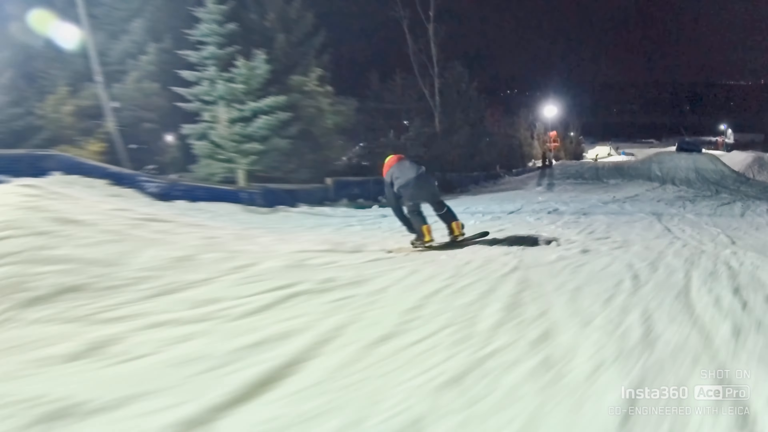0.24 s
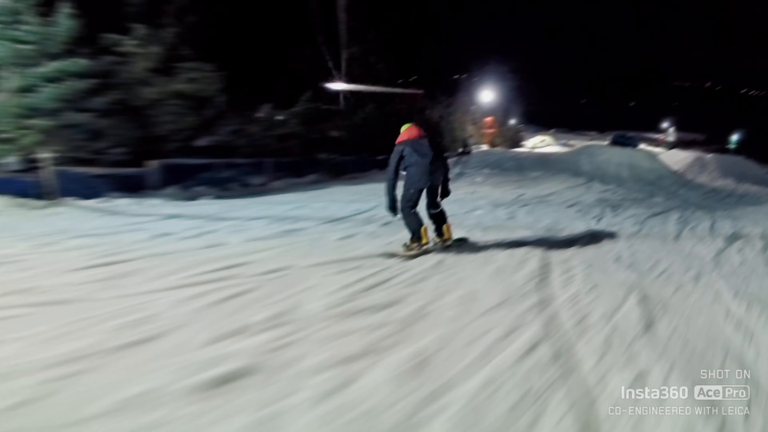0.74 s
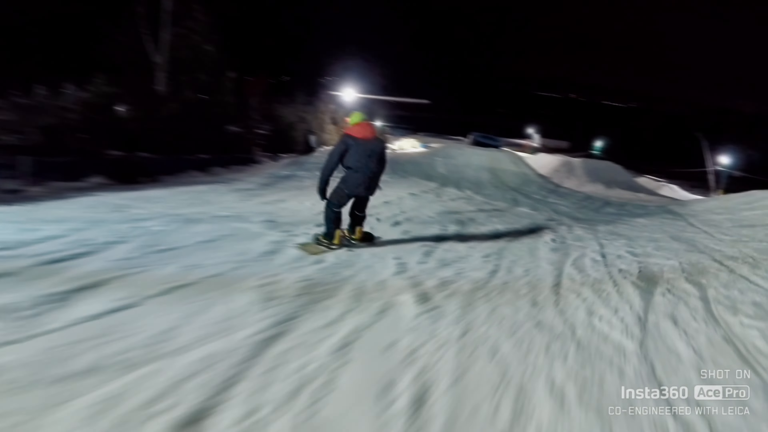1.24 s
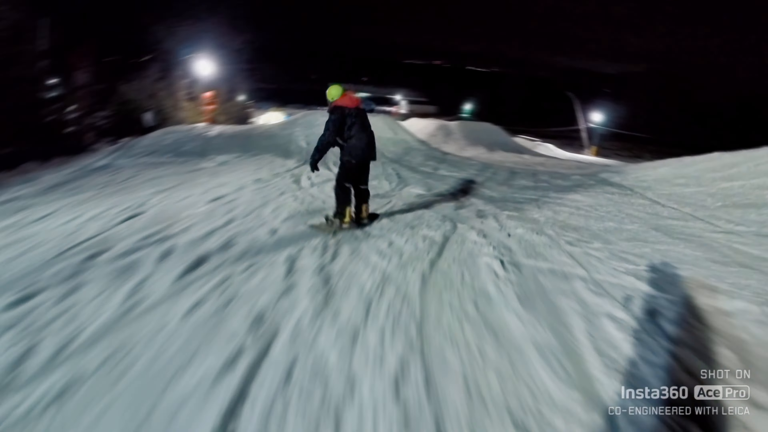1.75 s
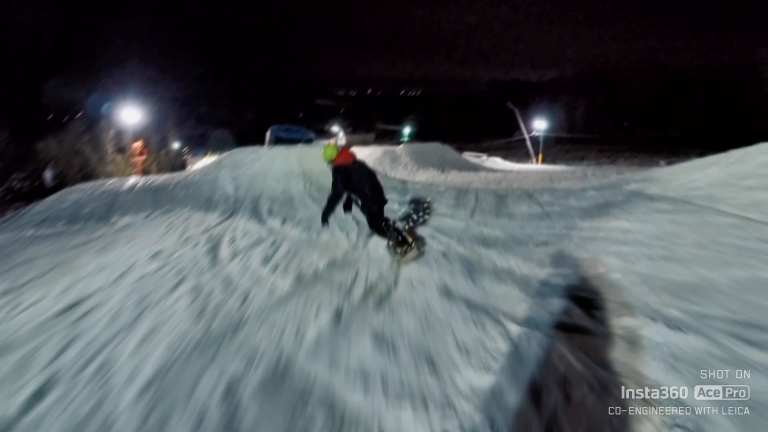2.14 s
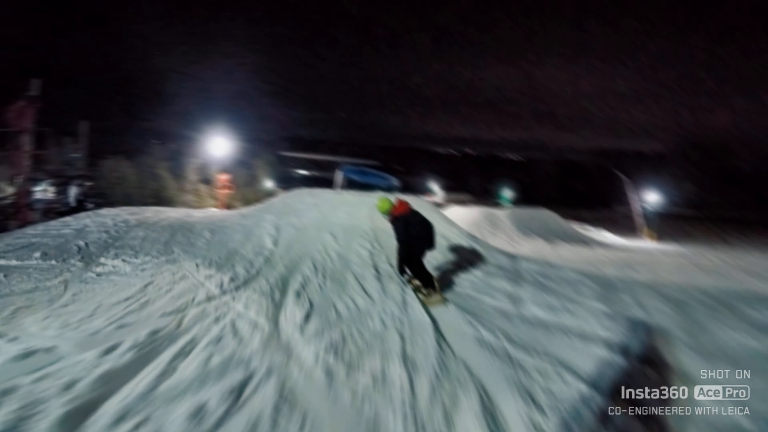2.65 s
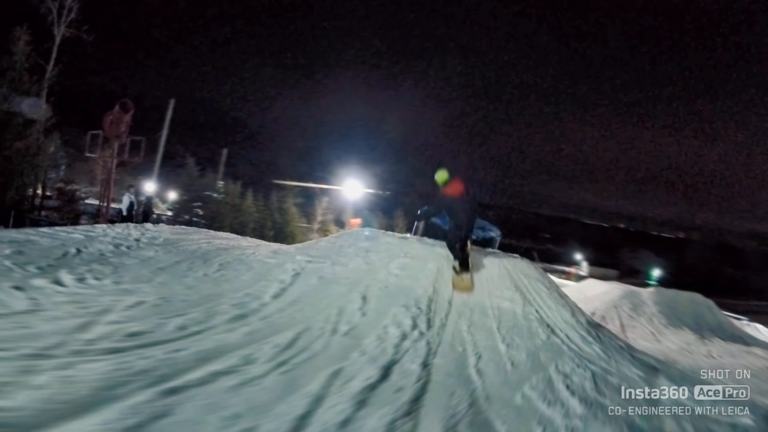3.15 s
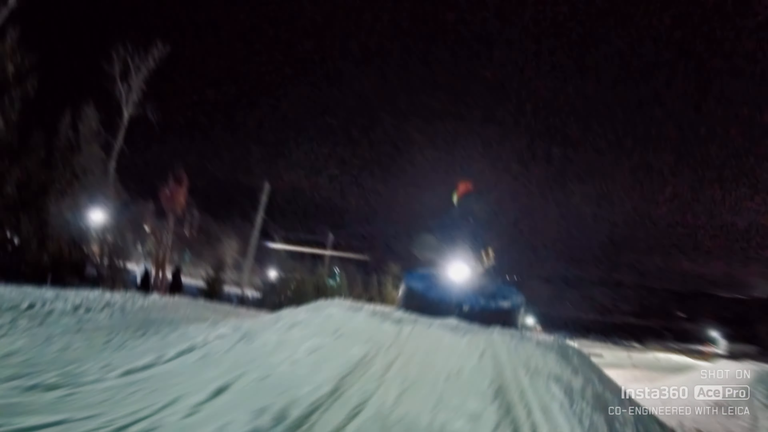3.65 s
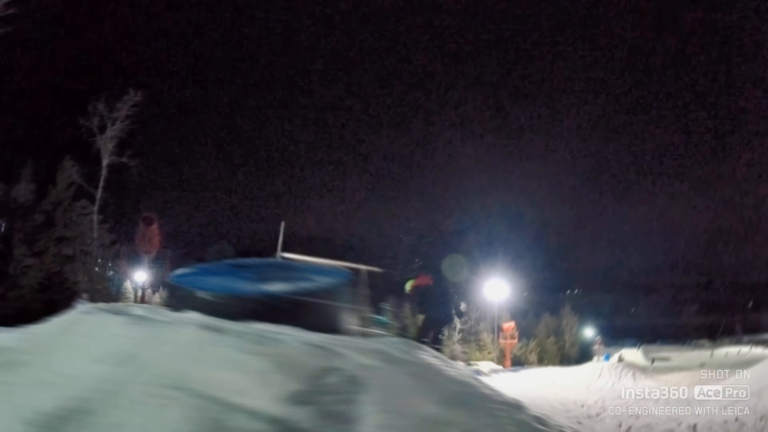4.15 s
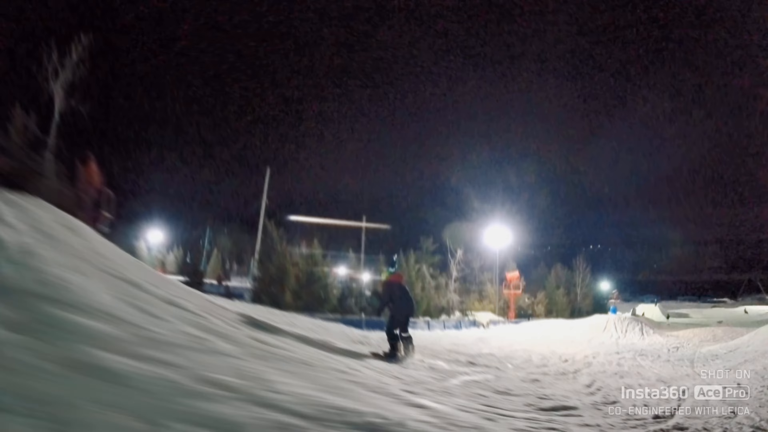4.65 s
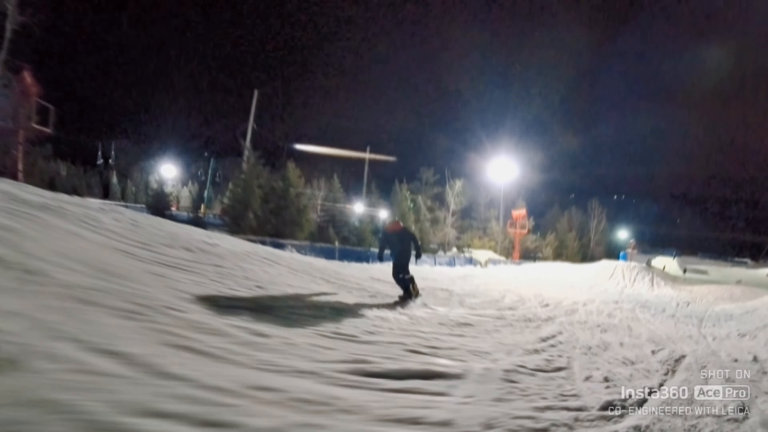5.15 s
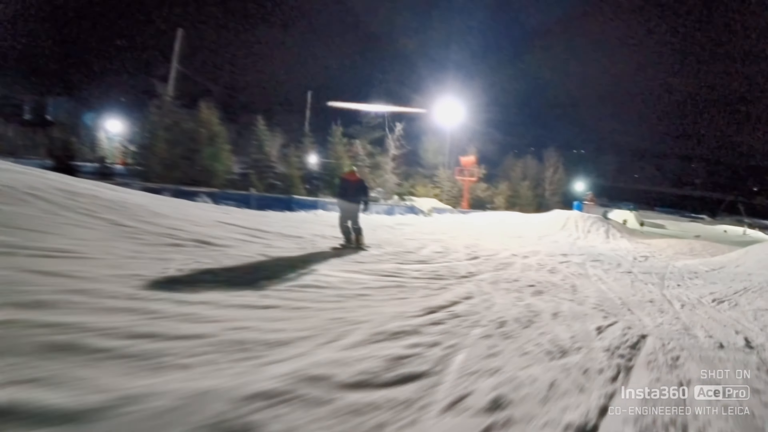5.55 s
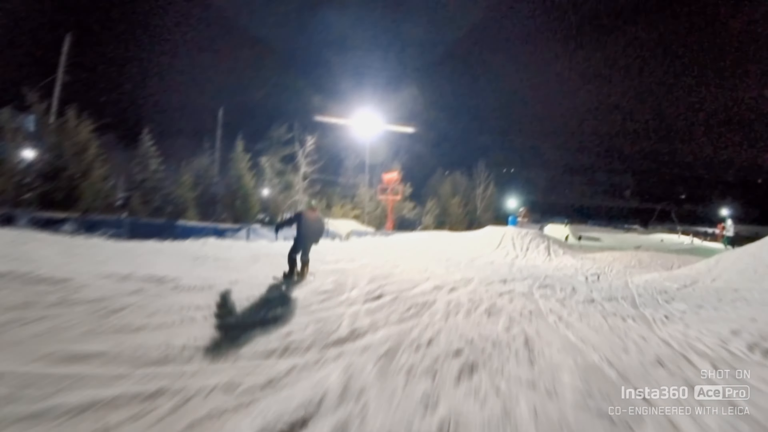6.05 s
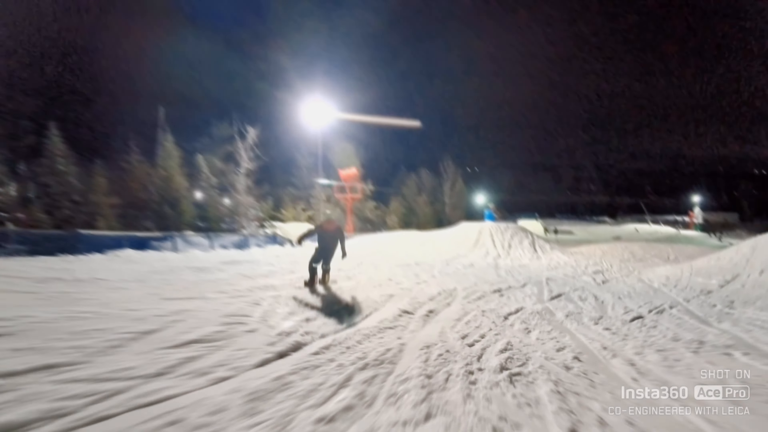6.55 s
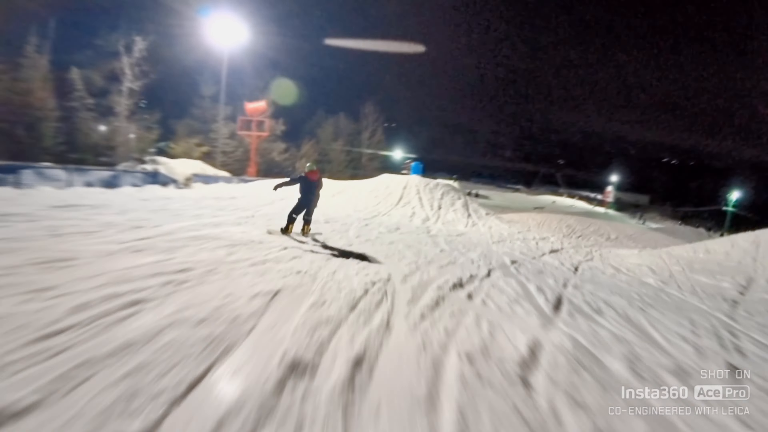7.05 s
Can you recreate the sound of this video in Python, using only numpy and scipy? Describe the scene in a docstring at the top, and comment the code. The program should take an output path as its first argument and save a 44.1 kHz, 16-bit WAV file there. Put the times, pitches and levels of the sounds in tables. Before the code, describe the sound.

Wind buffets and crackles on the microphone as a snowboard hisses and scrapes over snow, clacking once onto a hollow obstacle.

```python
"""A night ride downhill behind a snowboarder. From the start, turbulence at the microphone ports
rumbles and breaks into crackling gusts that push a limiter, while friction on packed snow makes
the boards hiss and scrape. Two light knocks follow, and deep thumps of air set in. At 3.5 s the
board ahead clacks onto a hollow obstacle, and two low modes hum on for a second. From 5.5 s the
edge rasps over icy patches, and a last gust arrives at 6.9 s."""
import sys
import numpy as np
from scipy import signal
from scipy.fft import rfft, irfft, next_fast_len
from scipy.io import wavfile
from scipy.ndimage import uniform_filter1d, minimum_filter1d, map_coordinates

SR = 44100
rng = np.random.default_rng(int(sys.argv[2]) if len(sys.argv) > 2 else 0)


def dump_mix(stems):
    """Bounce the given channels to the path in sys.argv[1] as a 16-bit WAV at rate SR."""
    frames = np.atleast_2d(stems).T  # one column per channel
    limited = np.clip(frames, -1, 1)  # hard clip at full scale
    pcm = np.round(limited * 32767).astype(np.int16)
    wavfile.write(sys.argv[1], SR, pcm)


N = 321487


def amp(db):
    """Amplitude ratio of a level in decibels."""
    return 10 ** (np.asarray(db) / 20)


def unit(x):
    """Normalisation to rms 1."""
    return x / np.sqrt(np.mean(x ** 2) + 1e-20)


def along(points, hz):
    """Interpolation of (f/Hz, value) points on a logarithmic frequency axis."""
    f, values = np.transpose(points)
    return np.interp(np.log(hz + 1), np.log(f + 1), values)


def curves(rows):
    """Linear interpolation in time: one curve for each column after t/s."""
    times, *columns = np.transpose(rows)
    return [np.interp(np.arange(N) / SR, times, column) for column in columns]


def wobble(rate):
    """Random modulation: a spline through rate Gaussian values a second."""
    knots = rng.standard_normal(int(N * rate / SR) + 4)
    return map_coordinates(knots, [np.arange(N) * rate / SR])


def swell(s, half_width_s):
    """Gaussian envelope of height 1 centred on time s."""
    return np.exp(-np.minimum(((np.arange(N) / SR - s) / half_width_s) ** 2, 50))


def smooth(x, seconds):
    """Moving average with triangular weights."""
    size = max(1, int(seconds * SR))
    return uniform_filter1d(uniform_filter1d(x, size), size)


def steady(x, seconds):
    """Division by the running rms: slow changes of level vanish, faster detail stays."""
    power = np.mean(np.atleast_2d(x) ** 2, axis=0)
    return x / np.sqrt(np.abs(smooth(power, seconds)) + 1e-12)


def filtered(x, response):
    """Linear filtering: the spectrum is multiplied by response(f/Hz)."""
    n = x.shape[-1]
    padded = next_fast_len(n + 4096)
    return irfft(rfft(x, padded) * response(np.fft.rfftfreq(padded, 1 / SR)), padded)[..., :n]


def stereo(pair, spectrum, correlation):
    """Partial coherence: two independent signals, coloured and mixed to left and right at rms 1."""
    def response(hz):
        angle = np.arccos(np.clip(along(correlation, hz), -1, 1)) / 2
        return amp(along(spectrum, hz)) * [np.cos(angle), np.sin(angle)]
    mid, side = filtered(pair, response)
    return unit(np.array([mid + side, mid - side]))


def patchy(depth_db):
    """Spectral modulation: two noises share patches of random gain in time and frequency."""
    spectra = signal.stft(rng.standard_normal((2, N)), nperseg=512)[2]
    patches = uniform_filter1d(rng.standard_normal(spectra.shape[1:]), size=5, axis=0)
    patches = uniform_filter1d(patches, size=10, axis=1)
    return signal.istft(spectra * amp(depth_db * unit(patches)), nperseg=512)[1][:, :N]


# Colour of eddies at a microphone port: f/Hz, gain/dB
PORT_RESPONSE = [(40, -33), (80, -2), (130, 0.5), (400, -2.5), (900, -1.5), (1600, -0.5), (2300, -1.5),
                 (3200, -3), (4500, -2), (8000, -42), (15000, -55)]


def port(x, corner_hz, steepness=2.92, smallest_hz=2900):
    """Dissipation as a low-pass: the smallest eddies die out, the sooner the slower the air."""
    limit_hz = smallest_hz * (corner_hz / 600) ** 0.084
    def response(hz):
        rolloff = np.sqrt(1 + (hz / corner_hz) ** steepness)
        dissipation = np.hypot(1, (hz / limit_hz) ** 4)
        return amp(along(PORT_RESPONSE, hz)) / rolloff / dissipation
    return filtered(x, response)


# Spells of turbulence, one curve each: t/s, level/dB, corner f/Hz (faster air, smaller eddies)
TURBULENT_SPELLS = [
    [(0.0, -12.5, 1280), (0.3, -15.5, 1720), (0.507, -16.5, 1470)],
    [(1.506, -12.3, 260), (1.72, -13, 310), (1.87, -18.5, 890), (2.05, -21.5, 870), (2.14, -13, 950),
     (2.215, -14.5, 940)],
    [(2.25, -16.5, 560), (2.33, -11.5, 810), (2.395, -14.5, 330)],
    [(2.408, -12, 616), (2.48, -13, 700), (2.54, -20, 260)],
    [(6.903, -7.5, 297), (7.04, -18.5, 110), (7.13, -14.5, 280), (7.29, -15.5, 342)],
]


def surges(mean_s=0.045, scatter_db=0.9, jitter=0.12):
    """Intermittency: each spell breaks into uneven surges, given as rows like those of AIR_PUFFS."""
    rows = []
    for spell in TURBULENT_SPELLS:
        times, db, corner_hz = np.transpose(spell)
        duration = times[-1] - times[0]
        count = max(1, int(duration / mean_s))
        shift, size = rng.standard_normal(size=(2, 64))[:, :count]
        steps = np.arange(count) + jitter * np.tanh(shift) * (np.arange(count) > 0)
        edges = np.append(times[0] + duration * steps / count, times[-1])
        middles = (edges[:-1] + edges[1:]) / 2
        levels_db = np.interp(middles, times, db) + scatter_db * size
        rows += zip(edges[:-1], np.diff(edges), levels_db, np.interp(middles, times, corner_hz))
    return rows


# Lone puffs of air: onset t/s, duration/s, level/dB, corner f/Hz
AIR_PUFFS = [(0.536, 0.062, -20.5, 680), (0.653, 0.022, -26.5, 700), (1.433, 0.022, -4, 110),
             (2.549, 0.028, -12.5, 202), (2.598, 0.058, -15, 360), (2.664, 0.059, -7, 169),
             (3.02, 0.044, -20, 130), (3.315, 0.025, -21.5, 130), (3.463, 0.011, -5, 510),
             (3.484, 0.026, -19.5, 460), (3.801, 0.02, -21, 310), (3.92, 0.077, -10.5, 165),
             (4.014, .038, -15.5, 320), (4.08, .012, -21, 320), (4.332, 0.01, -19, 600),
             (4.387, 0.028, -15, 110), (4.487, 0.089, -13, 170), (4.798, .055, -20.5, 950),
             (4.874, .016, -15, 1200), (5.02, 0.028, -19.5, 200)]


def gusts(edge_s=0.0021, trail_db=-16, trail_s=0.038, cusp=0.16, cusp_hz=1100):
    """Turbulence as shot noise: eddies hit the port in clumps, dense in fast air, as spits in slow."""
    arrivals = rng.random(N) < 4500 / SR  # 4500 eddies a second on average
    eddies = arrivals * np.sign(rng.standard_normal(N)) * amp(3.5 * rng.standard_normal(N))
    clumps_db = 3.53 * wobble(150) + 2 * wobble(50)
    out, margin = np.zeros(N), SR // 12
    for start, length, db, corner_hz in surges() + list(AIR_PUFFS):
        span = np.arange(max(0, int(start * SR) - margin), min(N, int((start + length) * SR) + margin))
        past_s = span / SR - start - length
        trail = amp(trail_db) * np.exp(-np.abs(past_s) / trail_s)  # weaker eddies follow each burst
        gate = smooth((span >= start * SR) * np.where(past_s < 0, 1, trail), edge_s)
        clumping = (600 / corner_hz) ** 0.32
        clumped = eddies[span] * amp(clumps_db[span] * clumping)
        flow = steady(port(clumped, corner_hz), seconds=0.026)
        # pressure grows faster than the flow, so the strongest eddies steepen into spikes
        burst = gate * (flow + cusp * port(flow * np.abs(flow), cusp_hz))
        out[span] += amp(db) * burst * np.sqrt(np.sum(gate ** 2) / (np.sum(burst ** 2) + 1e-20))
    lean_db = 0.7 + 0.54 * wobble(25)  # the ports share each gust at shifting strengths
    return (out + amp(3.5) * pops()) * amp([lean_db, -lean_db])


# Strength of the slow buffeting: t/s, level/dB
BUFFET_LEVEL = [(0.0, -24), (0.35, -30.5), (0.69, -20), (0.84, -24.5), (1.2, -21), (1.5, -15), (1.8, -13.5),
                (1.93, -28.5), (2.15, -19.5), (2.55, -22.5), (2.82, -22), (3.2, -25.5), (3.5, -19),
                (3.75, -22.5), (4.3, -24), (4.9, -17.5), (5.6, -24.5), (6.8, -23.5), (7.29, -20)]
# Spectrum of the large eddies: f/Hz, spectral level/dB
RUMBLE_SPECTRUM = [(11, -43), (18, -16), (37, -5.5), (54, 3.5), (69, 0), (97, -5), (172, -12.5),
                   (260, -26.5), (518, -36.5), (600, -31.5), (780, -37.5), (1320, -120)]
# Likeness of the large eddies at the two ports: f/Hz, correlation
RUMBLE_CORRELATION = [(25, 0.79), (50, 0.065), (80, 0.72), (125, 0.91), (300, 0.96)]
# Spectrum of the smaller eddies: f/Hz, spectral level/dB
FLUTTER_SPECTRUM = [(50, -38), (110, -1.5), (180, 3), (300, -9.5), (600, -12), (2000, -46)]


def buffeting(wake_db=-8, wake_s=0.036, flutter_db=-11.5, flutter_growth=0.13, pivot_db=-22):
    """Amplitude modulation: large eddies swell with each puff; smaller ones flutter on their crests."""
    level_db, = curves(BUFFET_LEVEL)
    wakes = sum(amp(db + wake_db) * swell(start + length / 2, wake_s)
                for start, length, db, _ in AIR_PUFFS)
    rumble = stereo(rng.standard_normal((2, N)), RUMBLE_SPECTRUM, RUMBLE_CORRELATION)
    rumble = steady(rumble, seconds=0.067) * amp(1.97 * wobble(18))
    crests = steady(smooth(rumble.mean(axis=0) ** 2, 0.0055), seconds=0.22)
    flutter = unit(filtered(rng.standard_normal(N), lambda hz: amp(along(FLUTTER_SPECTRUM, hz))))
    # the flutter gains on the rumble in strong wind
    flutter *= crests * amp(level_db + flutter_db + flutter_growth * (level_db - pivot_db))
    return (np.hypot(amp(level_db), wakes) * rumble + flutter) * amp([[.3], [-.3]])


# Boards gliding on snow: t/s, level/dB
GLIDE_LEVEL = [(0.0, -31.5), (0.06, -34), (0.59, -40.5), (0.65, -35), (1.32, -28.5), (1.56, -39),
               (2.43, -44), (2.84, -34.5), (3.02, -38), (3.21, -34), (3.71, -40.5), (4.24, -42.5),
               (4.26, -40), (5.6, -28.5), (5.72, -26), (5.79, -29.5), (6.42, -31), (6.56, -35),
               (6.62, -28.5), (6.9, -28.5), (6.92, -35.5), (7.07, -33), (7.29, -38.5)]
# Dips in the glide while the board crosses the obstacle: t/s, depth/dB
GLIDE_LULLS = [(3.75, 5.5), (4.17, 4.5)]
# Bite of the edge, added to the glide level for the scrape: t/s, gain/dB
EDGE_BITE = [(0, -3), (.75, 0), (.88, 5), (1.15, -1.5), (1.3, 5), (2, -2.5), (4.15, -2.5), (4.25, 2.5),
             (5.85, -1.5), (6.3, 0.5), (7.29, -5)]
# Spectrum of the shearing crystals: f/Hz, spectral level/dB
SPRAY_SPECTRUM = [(1500, -12.5), (3000, -3), (3700, -4.5), (5000, 0.5), (5800, -3), (7000, -2),
                  (9000, -5.5), (10800, -10), (12000, -21), (14000, -19), (15300, -31)]
# Spectrum of the scraping edge: f/Hz, spectral level/dB
SCRAPE_SPECTRUM = [(150, -6), (300, -13), (800, -6.5), (1100, -4), (1350, -5), (1500, 0.5), (1750, -3),
                   (2200, 0), (2550, -5.5), (3100, -3), (4000, -9.5), (7000, -49)]
# Likeness of left and right for sound from the slope: f/Hz, correlation
SNOW_CORRELATION = [(300, .985), (2000, .955), (4500, .935), (9000, .947), (12000, .992)]


def snow_friction(lull_half_width_s=0.035):
    """Friction noise: crystals shear under the base as spray; the edge chatters over ridges."""
    glide_db, = curves(GLIDE_LEVEL)
    glide_db -= sum(depth_db * swell(s, lull_half_width_s) for s, depth_db in GLIDE_LULLS)
    bite_db, = curves(EDGE_BITE)
    ridges = wobble(60)
    crumbs = amp(1.13 * wobble(900))
    spray = stereo(patchy(depth_db=1.05) * crumbs, SPRAY_SPECTRUM, SNOW_CORRELATION)
    scrape = stereo(patchy(depth_db=1.5) * crumbs, SCRAPE_SPECTRUM, SNOW_CORRELATION)
    spray *= amp(glide_db + 2.76 + 0.91 * ridges) * amp([[.5], [-.5]])
    scrape *= amp(glide_db + bite_db + 3.5 + 0.94 * ridges) * amp([[1.2], [-1.2]])
    drift_db = 0.51 * wobble(3.95)  # spray and scrape drift slightly left and right at random
    return (spray + scrape) * amp([drift_db, -drift_db])


# Strength of the finest hiss: t/s, level/dB
HISS_LEVEL = [(0, -53), (1.8, -54), (2.6, -47), (4.1, -57), (5.5, -56)]


def hiss():
    """Broadband noise peaking at 12 kHz: a thin hiss swells and ebbs under everything."""
    level_db, = curves(HISS_LEVEL)
    spectrum = [(4000, -2), (10000, -3), (12000, 4), (14000, 1), (15400, -12)]  # f/Hz, level/dB
    return amp(level_db) * stereo(rng.standard_normal((2, N)), spectrum, SNOW_CORRELATION)


# Sharpest pops within the gusts: t/s, relative peak level/dB
EDDY_POPS = [(0.237, -12), (0.368, -8), (1.508, -8.5), (1.604, -6), (1.751, -4), (2.17, -3), (2.468, -6.5),
             (4.548, -15.5), (6.91, -7), (7.088, -13.5)]


def pops(life_s=0.0024, corner_hz=1100):
    """Pressure transients: single small eddies burst right on the port."""
    t = np.arange(-SR // 50, SR // 50) / SR
    out = np.zeros(N + SR)
    for s, db in EDDY_POPS:
        eddy = rng.standard_normal(len(t)) * np.exp(-(t / life_s) ** 2)
        burst = port(eddy, corner_hz, smallest_hz=3480)
        out[round((s + t[0]) * SR):][:len(t)] += amp(db) * burst / np.abs(burst).max()
    return out[:N]


# Impacts on the board, the loudest on the obstacle: t/s, level/dB
BOARD_IMPACTS = [(.718, -17), (0.865, -13.5), (3.5405, -4), (4.215, -17)]
# Modes of the board: f/Hz, level/dB, decay time T60/s
BOARD_MODES = [(690, -7, .03), (1250, -13, .035), (1670, 2.5, 0.02), (2150, -1, 0.01), (2690, -5, 0.02),
               (3630, -8, 0.013), (4500, -17, .012)]


def knocks(crack_t60=0.005, tail_t60=0.33, tail_db=-17):
    """Impact excitation: the board's damped modes ring, and the slope scatters the clack back."""
    t = np.arange(SR // 2) / SR
    lowpass = signal.butter(4, 5200, fs=SR, output="sos")
    tail_spectrum = [(300, 1), (1700, -7), (4200, -7), (6000, -17), (12000, -41)]  # f/Hz, level/dB
    out = np.zeros((2, N + SR))
    for s, db in BOARD_IMPACTS:
        ring = np.zeros(len(t))
        for hz, mode_db, t60 in BOARD_MODES:
            decay = amp(mode_db + rng.normal(0, 1.4) - 60 * t / t60)
            ring += decay * np.sin(2 * np.pi * hz * t + rng.uniform(0, 2 * np.pi))
        crack = 1.05 * rng.standard_normal(len(t)) * amp(-60 * t / crack_t60)
        direct = signal.sosfilt(lowpass, .5 * ring + crack)
        tail = stereo(rng.standard_normal((2, len(t))), tail_spectrum, SNOW_CORRELATION)
        tail *= amp(tail_db - 60 * t / tail_t60)
        out[:, round(s * SR):][:, :len(t)] += amp(db) * (direct + tail)
    return out[:, :N]


# Deep thumps of air without crackle: t/s, level/dB
AIR_THUMPS = [(1.4, -21), (3.35, -13), (4.72, -24), (5.35, -16), (5.78, -19.5), (6.07, -13), (6.28, -15),
              (6.45, -20), (6.66, -20), (6.95, -13), (7.24, -16)]


def thumps(corner_hz=75, half_width_s=0.036, lean_db=-1):
    """Large-scale turbulence: the largest eddies give only a deep push, unlike from port to port."""
    rumble = stereo(rng.standard_normal((2, N)), RUMBLE_SPECTRUM, RUMBLE_CORRELATION)
    deep = steady(filtered(rumble, lambda hz: 1 / (1 + (hz / corner_hz) ** 2)), seconds=0.06)
    envelope = sum(amp(db) * swell(s, half_width_s) for s, db in AIR_THUMPS)
    return deep * envelope * amp([[lean_db], [-lean_db]])


# Hum of the hollow obstacle: t/s, lower mode level/dB, upper mode level/dB
HUM_LEVELS = [(3.45, -62, -60), (3.56, -15.5, -33), (3.72, -30, -34), (3.95, -16.5, -28), (4.1, -25.5, -35),
              (4.3, -27, -31), (4.6, -47, -22), (4.8, -62, -51)]


def hollow_hum(modes_hz=(107.5, 136.7), waver_rad=0.6):
    """Resonance of a hollow body: two low modes, unsteady in phase and strength."""
    t = np.arange(N) / SR
    out = np.zeros(N)
    for hz, db in zip(modes_hz, curves(HUM_LEVELS)):
        amplitude = np.sqrt(2) * amp(db + wobble(12))
        out += amplitude * np.sin(2 * np.pi * hz * t + waver_rad * wobble(24))
    return out


# Catches of the edge on ice: t/s, centre f/Hz, level/dB
ICE_RASPS = [(5.49, 2100, -22), (5.58, 2140, -23.5), (6.149, 2150, -23), (6.28, 2180, -26),
             (6.451, 2370, -23.5), (6.8, 970, -23.5), (6.885, 2060, -23)]


def rasps(half_width_s=0.0097, relative_width=0.16):
    """Noise-driven resonance: the edge catches on icy patches and briefly rings in a narrow band."""
    t = np.arange(-SR // 10, SR // 10) / SR
    envelope = np.exp(-(t / half_width_s) ** 2)
    out = np.zeros(N + SR)
    for s, centre_hz, db in ICE_RASPS:
        resonance = lambda hz: 1 / (1 + ((hz / centre_hz - 1) / relative_width) ** 2)
        ring = steady(filtered(rng.standard_normal(len(t)), resonance), seconds=0.029)
        out[round((s + t[0]) * SR):][:len(t)] += amp(db) * ring * envelope
    return out[:N] * amp([[1], [-1]])


def scene():
    """Superposition: wind at the microphone adds to the sounds of the ride."""
    return gusts() + buffeting() + snow_friction() + hiss() + knocks() + thumps() + hollow_hum() + rasps()


def record(dry, ceiling=1.0, hold_s=0.014, top_hz=15400):
    """Peak limiting: one fast gain ducks everything under the wind's spikes; a band limit follows."""
    peak = np.abs(dry).max(axis=0)
    needed = np.minimum(1, ceiling / (peak + 1e-9))
    held = minimum_filter1d(needed, int(hold_s * SR) + 1)
    gain = smooth(held, hold_s / 2)
    return filtered(dry * gain, lambda hz: hz < top_hz)


dry = scene()
out = record(dry)
dump_mix(out)
```